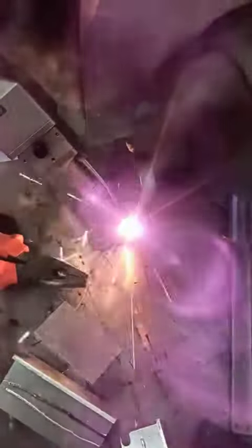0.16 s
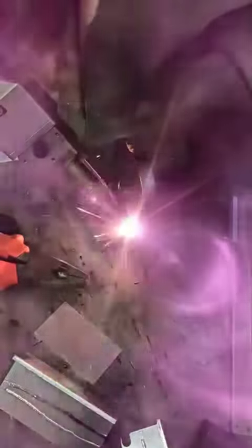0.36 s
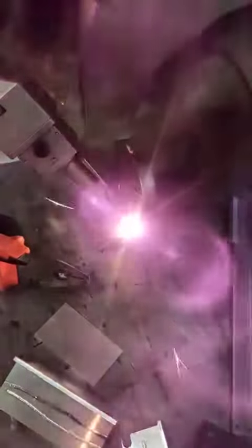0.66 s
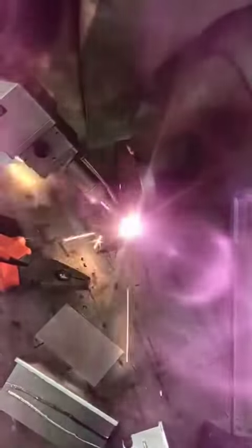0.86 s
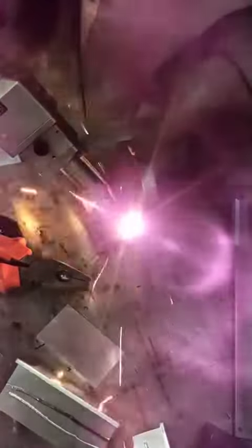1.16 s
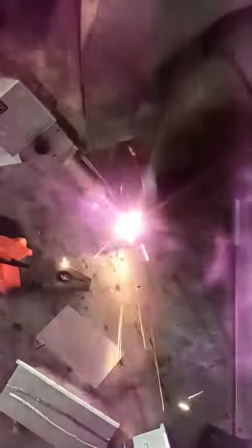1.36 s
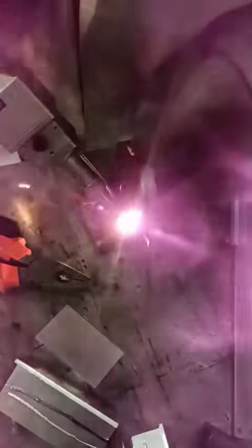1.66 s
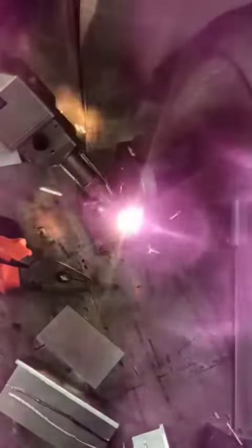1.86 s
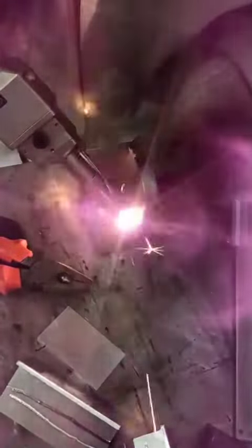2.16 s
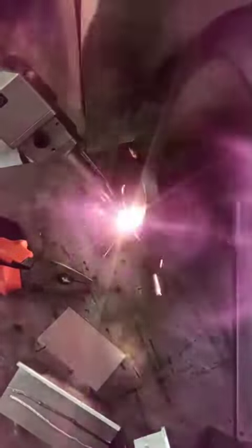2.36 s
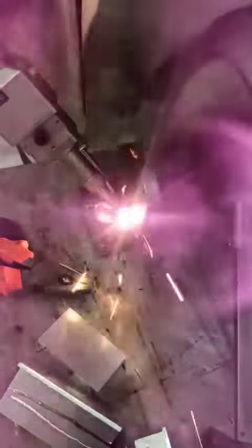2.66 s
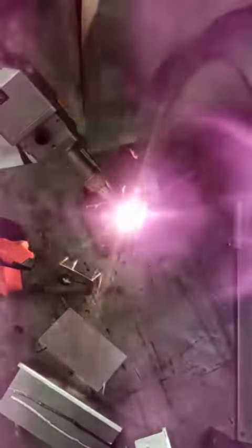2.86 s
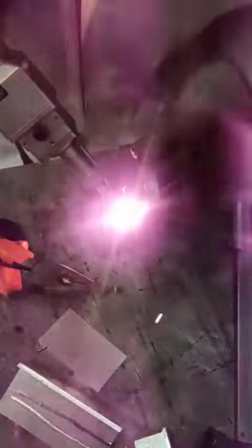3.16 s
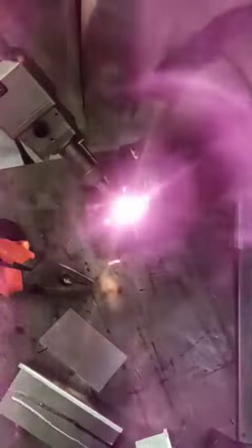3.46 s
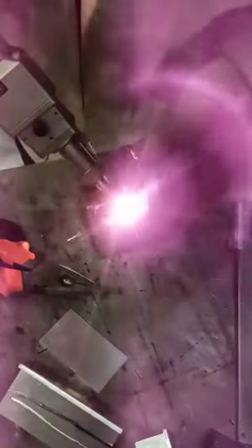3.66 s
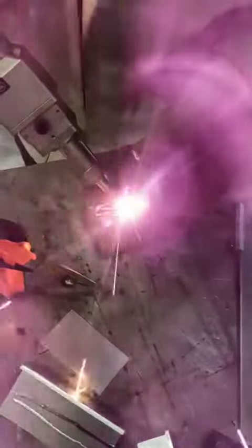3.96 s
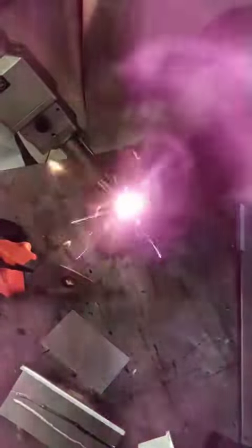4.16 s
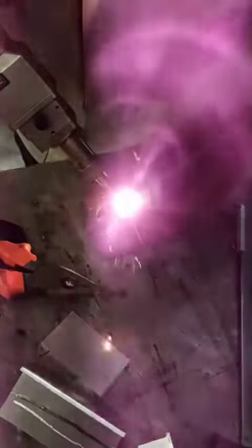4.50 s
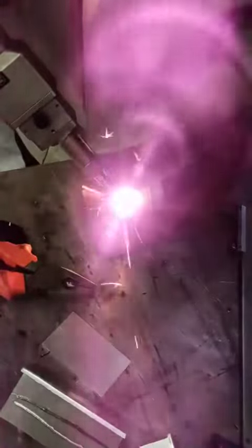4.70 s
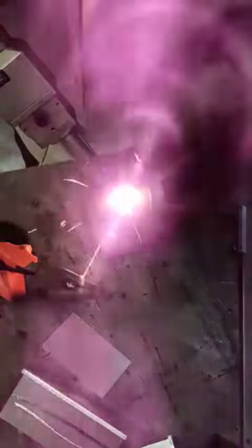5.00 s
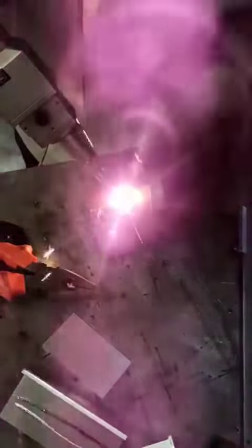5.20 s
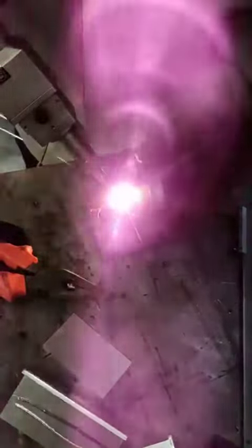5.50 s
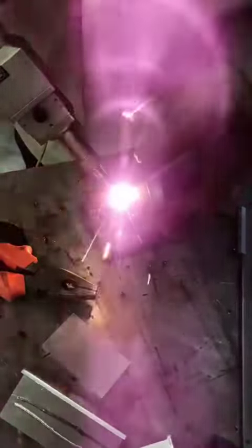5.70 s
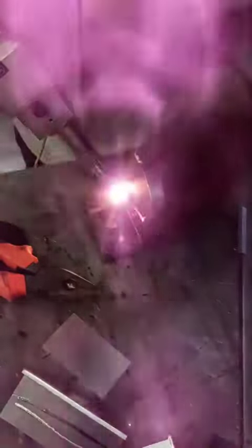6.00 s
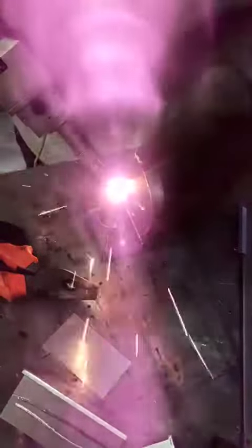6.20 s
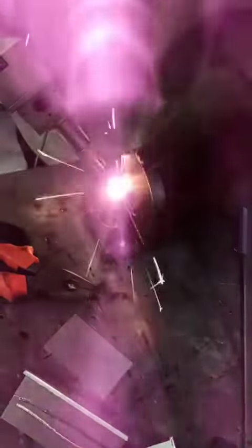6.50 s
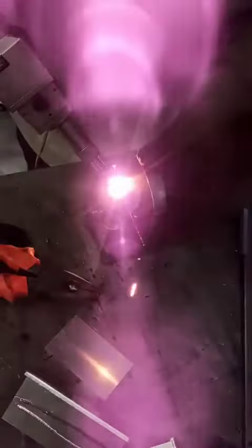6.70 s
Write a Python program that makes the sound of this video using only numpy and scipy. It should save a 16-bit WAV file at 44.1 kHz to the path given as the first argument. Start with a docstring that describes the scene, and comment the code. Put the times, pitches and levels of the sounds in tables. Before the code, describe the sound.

From 0 s a welding torch is in full operation close to a stereo microphone: a dense, bright, dry sizzle centred in the high treble, pulsing about sixty times a second so that it has a raspy buzz, its rate swaying slightly about once a second. Gas rush and nozzle hiss are stronger during the first second, then settle. The sizzle swells briefly around 1 s and 2.35 s, drops softer just after 3 s, flares at 4 s and grows brighter again from about 5 s. Small dull spatter ticks land around 2.3-2.6, 3.9, 5.05, 5.4, 5.6, 5.9, 6.45 and 6.7 s. At 5.9 s the sizzle falters for an instant with one soft low bump on the bench. Throughout, a cooling fan rumbles quietly with a slightly wavering low hum and faint draught, in a workshop with short reflections. The weld continues to the end, near 6.85 s.

```python
"""Handheld laser welding in a workshop

A laser welder runs a seam along a steel plate, close to a microphone with a left and a right port.
The beam's swing gates noise into about sixty sizzling bursts a second, speeding up and slowing down.
Coloured noise makes the gas rush, nozzle hiss and draught; decaying noise and knocks make the spatter.
Behind them a cooling unit adds fan noise and wavering sine tones; one soft bump lands on the bench."""
import sys
import numpy as np
from scipy import signal
from scipy.fft import rfft, irfft
from scipy.io import wavfile
from scipy.ndimage import uniform_filter1d, map_coordinates

SR = 44100
rng = np.random.default_rng(int(sys.argv[2]) if len(sys.argv) > 2 else 0)


def pcm_store(signal):
    """Save signal as 16-bit PCM."""
    levels = np.round(np.clip(np.atleast_2d(signal), -1, 1) * 32767)
    wavfile.write(sys.argv[1], SR, levels.astype(np.int16).T)


N = 301950


def undb(db):
    """Decibels to gain."""
    return 10 ** (np.asarray(db) / 20)


def unit(x):
    """Scale to rms 1."""
    return x / np.sqrt(np.mean(x ** 2))


def bell(offset, width):
    """A smooth bump, 1 at its centre and 1/e at half the width to either side."""
    return np.exp(-(2 * offset / width) ** 2)


def curves(table):
    """Each value column of a table of (time_s, ..) rows, interpolated sample by sample."""
    time_s, *columns = np.transpose(table)
    t = np.arange(N) / SR
    return [np.interp(t, time_s, column) for column in columns]


def colour(x, table):
    """Filter by (freq_hz, level_db) points; with two level columns each channel has its own."""
    freq_hz, *columns = np.transpose(table)
    log_table = np.log(freq_hz)
    log_f = np.log(np.arange(N // 2 + 1) * SR / N + 1)
    # beyond the end points the response falls steeply
    outside = np.abs(log_f - np.clip(log_f, log_table[0], log_table[-1]))
    response_db = np.array([np.interp(log_f, log_table, column) for column in columns]) - 150 * outside
    return irfft(rfft(x) * undb(response_db), N)


def walk(rate_hz):
    """Random levels held for 1 / rate_hz and smoothed twice, with rms near 1."""
    hold = max(int(SR / rate_hz), 2)
    steps = np.repeat(rng.standard_normal(N // hold + 1), hold)
    smooth = uniform_filter1d(uniform_filter1d(steps, hold), hold)
    return unit(smooth[:N])


def delay(x, seconds):
    """Read a sound a moving time later."""
    return map_coordinates(x, [np.arange(N) - seconds * SR], order=5)


def ports(x, lag_s):
    """The sound reaches the left port first, the right one a moving time later."""
    return np.array([x[0], delay(x[1], lag_s)])


def pan(left_minus_right_db):
    """Left and right gains for a level difference, half to each side."""
    return undb(np.array([[.5], [-.5]]) * left_minus_right_db)


def stereo_noise(likeness):
    """Left and right noises that share a part (0-1) of their power."""
    share = np.clip(likeness, 0, 1)
    common = rng.standard_normal(N)
    separate = rng.standard_normal((2, N))
    return np.sqrt(share) * common + np.sqrt(1 - share) * separate


def reflections(t60_s):
    """Dense short echoes off bench and fixtures, different at each port, falling 60 dB in t60_s."""
    t = np.arange(SR // 4) / SR
    tail = rng.standard_normal((2, len(t))) * undb(-60 * t / t60_s)
    return tail / np.sqrt(np.sum(tail ** 2, axis=1, keepdims=True))


def workshop(x, scatter_db, t60_s):
    """Direct sound with the sound scattered around the workshop behind it."""
    scattered = signal.oaconvolve(x, reflections(t60_s), axes=1)[:, :N]
    return x + undb(scatter_db) * scattered


# fan colour: freq_hz, level_db [Hz, relative dB]
FAN_SPECTRUM = [(20, -27), (48, -28), (63, -13), (78, -23), (105, -8), (135, 0), (155, -4), (173, -2),
                (195, 0.5), (255, -6.5), (290, -8.5), (380, -18), (520, -18), (1200, -23.5)]
# pump and motor tones before level changes and pan: pitch_hz, level_db [Hz, rms dB]
HUM_TONES = [(63, -58), (172.7, -47.5), (234.6, -36.5), (399.5, -55)]
# slow level changes of hum and fan noise: time_s, hum_change_db, fan_change_db [s, dB, dB]
HUM_AND_FAN_LEVEL = [(0, 0.5, 0.5), (.25, 1, 1), (.55, -3.5, 2), (1.05, -2.5, -.5), (1.3, 3, -1.5),
                     (1.7, -2.5, -1), (2.2, -1, 0), (2.9, -1.7, -1), (3.4, -0.1, -1.5), (4.3, 0.3, 1.5),
                     (4.8, 1, .8), (5.6, -0.5, -0.5), (6.85, -0.8, 1.5)]


def cooler(fan_db=-39.0, waver_db=0.7, drift=0.0018, pan_db=1.1):
    """Fan rumble from coloured noise, with the slightly wavering sine tones of pump and motor."""
    hum_change_db, fan_change_db = curves(HUM_AND_FAN_LEVEL)
    fan = unit(colour(stereo_noise(likeness=0.82), FAN_SPECTRUM)) * undb(fan_db + 1.3 * walk(3.7))
    # all tones share one clock, whose speed drifts by a small fraction
    clock_s = np.cumsum(1 + drift * walk(4.01)) / SR
    hum = np.zeros(N)
    for pitch_hz, level_db in HUM_TONES:
        amplitude = np.sqrt(2) * undb(level_db + waver_db * walk(7.6))
        hum = hum + amplitude * np.sin(2 * np.pi * pitch_hz * clock_s)
    return (fan * undb(fan_change_db) + hum * undb(hum_change_db)) * pan(pan_db)


def draught(level_db=-58, gust_db=2, pan_db=10):
    """Moving air rumbles faintly on the ports, mostly the left."""
    rumble = colour(stereo_noise(likeness=0.068), [(20, -12), (45, -2), (65, 13), (110, 1), (250, -33)])
    return unit(rumble) * undb(level_db + gust_db * walk(4.76)) * pan(pan_db)


def bump(centre_s=5.91, length_s=0.066, level_db=-30.5):
    """One soft low bump on the bench: a short swell of low noise."""
    thud = unit(colour(stereo_noise(likeness=0.93), [(140, -1), (220, 5), (400, -15), (850, -7)]))
    return thud * undb(level_db) * bell(np.arange(N) / SR - centre_s, length_s)


# spatter landing on the bench: start_s, level_db [s, relative dB]
SPATTER_LANDINGS = [(2.279, -35), (2.402, -27.5), (2.57, -29), (3.889, -30.5), (5.05, -27), (5.385, -35),
                    (5.401, -34), (5.637, -34), (5.898, -32), (5.919, -35), (6.456, -32), (6.698, -38)]
# colour of knock and splash: freq_hz, level_db [Hz, dB]
SPATTER_SPECTRUM = [(150, -4), (300, 6), (800, 10), (1300, 1), (2200, -10), (3500, -16), (9000, -28)]


def spatter(tick_db=5.0, knock_db=16, decay_s=0.0071, pan_db=3):
    """Drops of melt land with a dull knock (an impulse) and a brief splash (decaying noise)."""
    t = np.arange(SR // 20) / SR
    knocks, splashes = np.zeros(N), np.zeros(N)
    for start_s, level_db in SPATTER_LANDINGS:
        start = int(start_s * SR)
        knocks[start] += undb(level_db + knock_db)
        splashes[start:start + len(t)] += undb(level_db + tick_db) * np.exp(-t / decay_s)
    landings = knocks + splashes * stereo_noise(likeness=0.31)
    return colour(landings, SPATTER_SPECTRUM) * pan(pan_db)


# the torch along the seam: time_s, sizzle_db, top_hiss_db [s, dB, dB]
TORCH_COURSE = [(0, -19, -17), (1.5, -20, -19.5), (2.95, -21, -21), (3.1, -23.5, -23), (4.0, -22, -22.5),
                (4.6, -22.5, -22), (5.1, -19.5, -20), (5.9, -20, -22.5), (6.35, -19, -20.5),
                (6.85, -20, -20.5)]


def torch():
    """The torch's slow course: sizzle level and top hiss level, in dB."""
    return curves(TORCH_COURSE)


# the pool boils up or falters: centre_s, length_s, sizzle_change_db, depth_lost [s, s, dB, 0-1]
POOL_UPSETS = [(0.0, 0.09, 0.5, 0.54), (0.312, 0.29, 1, 0.3), (0.725, 0.13, -1, 0.2),
               (1.037, 0.36, 2.5, 0.15), (2.346, 0.16, 4, 0.14), (2.915, 0.085, 1.5, 0.37),
               (4.012, 0.11, 2, 0), (5.113, 0.33, 2, .4), (5.86, 0.066, -3, 0.6)]


def upsets():
    """Each upset of the pool swells and fades as a bell: change of level in dB, and burst depth lost."""
    t = np.arange(N) / SR
    change_db, lost = np.zeros(N), np.zeros(N)
    for centre_s, length_s, upset_db, depth_lost in POOL_UPSETS:
        swell = bell(t - centre_s, length_s)
        change_db += upset_db * swell
        lost += depth_lost * swell
    return change_db, lost


def settling(settle_s=0.84):
    """The extra gas at the start of the seam, from 1 down to 0."""
    return np.exp(-(np.arange(N) / SR / settle_s) ** 2)


# colour of the gas rush: freq_hz, level_db [Hz, relative dB]
GAS_SPECTRUM = [(150, -46), (330, 2), (480, -2), (700, -1), (1100, -7.5), (1600, -4.5), (2100, -9.5),
                (3000, -24), (6000, -11.5)]


def gas(rush_db=-42, start_db=3, follows=0.25, flutter_db=1.5, pan_db=3.5):
    """Turbulent shielding gas spreads over the plate, strong at first, following the pool's upsets."""
    change_db, _ = upsets()
    # follows: dB per dB of the sizzle's change
    level_db = rush_db + start_db * settling() + follows * change_db
    flow = undb(flutter_db * walk(330)) * stereo_noise(likeness=0.13)
    return unit(colour(flow, GAS_SPECTRUM)) * undb(level_db) * pan(pan_db)


# the beam's swing speeds up and slows down in a steady cycle, fastest at FASTEST_S
SWING_HZ, SWAY_HZ, SWAY_OVERTONE_HZ = 62.236, 3.6, .57
SWAY_PERIOD_S, FASTEST_S = .895, .59
# the bursts shift within the swing: start_s, length_s, shift_turns [s, s, turns]
BURST_SLIPS = [(3.0, .04, .33), (5.85, .35, -.4)]


def swing_angle():
    """Phase of the beam's swing, its rate swaying regularly; a burst at each whole turn."""
    t = np.arange(N) / SR
    sway = 2 * np.pi * (t - FASTEST_S) / SWAY_PERIOD_S
    rate_hz = SWING_HZ + SWAY_HZ * np.cos(sway) + SWAY_OVERTONE_HZ * np.cos(2 * sway)
    slipped = np.zeros(N)
    for start_s, length_s, shift_turns in BURST_SLIPS:
        slipped += shift_turns * np.clip((t - start_s) / length_s, 0, 1)
    return 2 * np.pi * (.7 + np.cumsum(rate_hz) / SR + slipped)


# colour of the nozzle jet: freq_hz, left_db, right_db [Hz, relative dB, relative dB]
JET_SPECTRUM = [(2115, -13, -13), (2356, -6, -4.5), (2610, -10.5, -11), (3100, -5, -3.5),
                (3350, -7.5, -7.5), (3610, -4, -5.5), (3860, -4.5, -7.5), (4230, -1.5, -6.5),
                (4610, -4, -5.5), (4850, -3.5, -7.5), (5770, 0, -1.5)]


def jet(angle, level_db=-34.5, start_db=3.5, follows=0.57, throb_db=2.5, waver_db=1.54):
    """The nozzle's own hiss, throbbing gently with the swing and rising and falling with the sizzle."""
    sizzle_db = torch()[0] + upsets()[0]
    # follows: dB per dB of the sizzle's change
    following_db = follows * (sizzle_db - np.mean(sizzle_db))
    jet_db = level_db + start_db * settling() + following_db + waver_db * walk(11)
    flow = undb(throb_db * np.cos(angle)) * stereo_noise(likeness=0.6)
    return unit(colour(workshop(flow, scatter_db=-3, t60_s=0.087), JET_SPECTRUM)) * undb(jet_db)


# how fully the sizzle dies between bursts while the pool is calm (0-1)
BURST_DEPTH = 0.88
# how much later the plate's echo arrives as the torch moves on: time_s, lag_s [s, s]
PLATE_ECHO_LAG = [(0, .000755), (2.4, .000775), (3.9, .0008), (5.2, .000823), (6.85, .000828)]


def boiling(angle, sharpness=0.77, grain_db=1.2, flicker_db=0.7, plate_echo=0.027):
    """Vapour leaves the melt in tiny uneven spurts, strongest once in each swing."""
    depth = BURST_DEPTH - upsets()[1]
    lag_s, = curves(PLATE_ECHO_LAG)
    gate = (1 + np.clip(depth, 0, .97) * np.cos(angle)) ** sharpness
    spurts = undb(grain_db * walk(1800) + flicker_db * walk(300))
    pool = rng.standard_normal(N)
    # the plate's echo combs the sound; the teeth slide as the torch moves
    pool = pool + plate_echo * delay(pool, lag_s)
    # the wide plume above the pool sounds different at each port
    plume = undb(-9) * rng.standard_normal((2, N))
    return gate * spurts * (pool + plume)


# colour of the sizzle: freq_hz, left_db, right_db [Hz, relative dB, relative dB]
SIZZLE_SPECTRUM = [(5570, -24, -20.5), (5670, -8, -3.5), (5890, -12.5, -24), (6270, -3, -3.5),
                   (6480, 1, -4.5), (7200, 0.5, -9.5), (7100, 3, 1), (7530, 1, 0), (7710, -3.5, -6.5),
                   (7870, -6.5, 0), (8040, 0, -1.5), (8040, 2, -14), (8426, 2, -10.5), (8720, -19, -15),
                   (8980, -31.5, -20)]
# colour of the top hiss: freq_hz, left_db, right_db [Hz, relative dB, relative dB]
HISS_SPECTRUM = [(8500, -26, -29), (9540, -36, -37.5), (10400, -21.5, -11.5), (10700, -21, -16),
                 (10700, -51, -31), (11650, -56, -21), (11517, -5.5, -5.5), (11970, -4, 3.5),
                 (12150, 7, -2.5), (13000, -14.5, -16), (12900, 3.5, -20), (13600, -4.5, -1),
                 (14200, -13, 1), (14380, -1.5, 5), (14500, -3, 3), (15000, -11.5, -3), (15600, 4, 7),
                 (16330, -5, -7)]
# how much later the right port hears the torch: time_s, sizzle_lag_s, top_hiss_lag_s [s, s, s]
RIGHT_PORT_LAG = [(0, .0005, .000771), (1, .000483, .000776), (2.9, .000479, .000788),
                  (4.2, .000486, .000804), (5.2, .00049, .000824), (6.85, .000493, .00083)]


def weld(angle, lip_db=-7, waver_db=0.34, hiss_follows=0.55, shade_pan=0.45):
    """The sizzle of the boiling melt and the thin hiss above it, each port with its own colour and lag."""
    level_db, top_db = torch()
    change_db = upsets()[0] + waver_db * walk(12)
    body_lag_s, top_lag_s = curves(RIGHT_PORT_LAG)
    melt = unit(workshop(boiling(angle), scatter_db=-9.5, t60_s=0.06))
    # a torch turned away is quieter, most at the right port (dB left minus right per dB lost)
    shade = pan(shade_pan * (np.mean(level_db) - level_db))
    body = unit(colour(ports(melt, body_lag_s), SIZZLE_SPECTRUM)) * shade
    # the nozzle's lip keeps hissing between the bursts
    lip = unit(workshop(stereo_noise(likeness=1.0), scatter_db=-3, t60_s=0.018))
    top = unit(colour(ports(melt + undb(lip_db) * lip, top_lag_s), HISS_SPECTRUM))
    sizzle = undb(level_db + change_db) * body
    hiss = undb(top_db + hiss_follows * change_db) * top
    return sizzle + hiss


# bands of the hiss that grow louder or softer and glide, differently in left and right:
# centre_s, length_s, pitch_hz, glide_hz_per_s, width_hz, left_db, right_db [s, s, Hz, Hz/s, Hz, dB, dB]
BAND_SWELLS = [ (0.2, 1.7, 6950, -150, 770, -3, -5), (0.3, 0.65, 3100, 0, 756, -5.5, -4.5),
               (0.8, 5.7, 4550, 0, 350, 3, 4.5), (0.9, 7.5, 6160, -70, 514, 4.5, 5.5),
               (0.9, 1.9, 12500, 0, 1540, -8.5, -8.5), (1.2, 4.6, 16050, -90, 770, -8, -30),
               (1.5, 2, 3170, 112, 565, -18.5, -12), (3.0, 2.7, 13760, -140, 1230, 7, 5.5),
               (3.0, 3.1, 7810, -60, 540, 8.5, 2.5), (3.2, 1.14, 3730, 390, 450, -8, -7),
               (3.4, 2.1, 14800, 60, 810, 7.5, -5.5), (3.6, 1.64, 5130, 0, 1760, -3.5, -9.5),
               (3.8, 1.4, 15650, 0, 1150, 8, 13), (4.402, 3.3, 9600, -30, 1220, 21.5, 9),
               (4.4, 1, 3490, -110, 950, -0.5, 3.5), (4.5, 5.3, 4300, 0, 355, 8, 3.5),
               (4.6, 9.3, 12100, -100, 730, -7, -3), (5.2, 2.3, 13100, -30, 480, -2, 17),
               (5.2, 0.9, 14600, 0, 870, 6, -4), (6.0, 2.2, 6610, 50, 750, 1.5, 5.5),
               (6.3, 0.93, 13200, -30, 810, 7.5, 10.5), (6.5, 1.4, 14400, -20, 990, 5, 0),
               (6.594, 1.15, 2970, 0, 1600, -3.5, -5.5)]


def moving_bands(x):
    """Bands of the hiss grow louder or softer and glide, by a gain over time and frequency per channel."""
    hz, t, spectrum = signal.stft(x, SR, nperseg=1024)
    gain_db = 0
    for centre_s, length_s, pitch_hz, glide_hz_per_s, width_hz, *channel_db in BAND_SWELLS:
        offset_hz = hz[:, None] - pitch_hz - glide_hz_per_s * (t - centre_s)
        shape = bell(t - centre_s, length_s) * bell(offset_hz, width_hz)
        gain_db = gain_db + np.multiply.outer(channel_db, shape)
    return signal.istft(spectrum * undb(gain_db), SR)[1][:, :N]


def scene():
    """The weld with its gas and spatter, over the cooling unit, the draught and the bump."""
    angle = swing_angle()
    at_the_torch = moving_bands(weld(angle) + jet(angle) + gas())
    return at_the_torch + spatter() + cooler() + draught() + bump()


def record(dry, top_hz=15800):
    """Limit peaks to 0.9, then cut the treble steeply above top_hz."""
    limited = np.clip(dry, -.9, .9)
    steep_cut = signal.ellip(10, .1, 50, top_hz, fs=SR, output="sos")
    return signal.sosfiltfilt(steep_cut, limited)


dry = scene()
out = record(dry)
pcm_store(out)
```